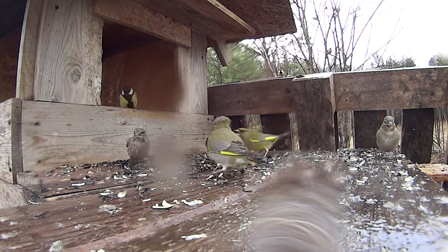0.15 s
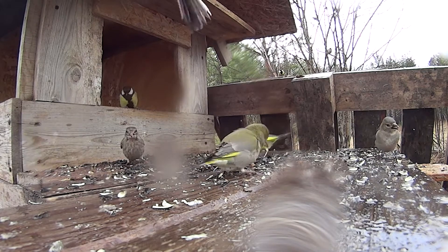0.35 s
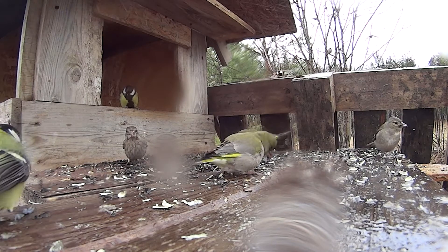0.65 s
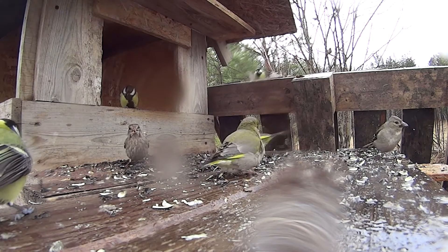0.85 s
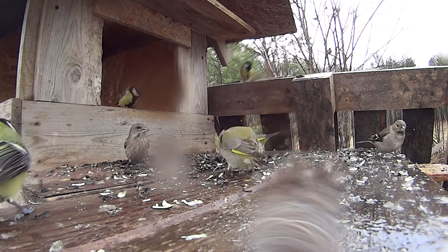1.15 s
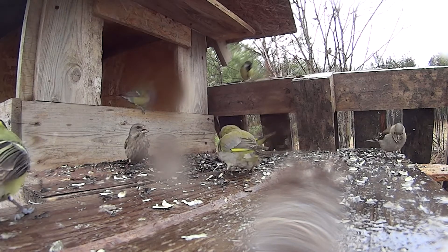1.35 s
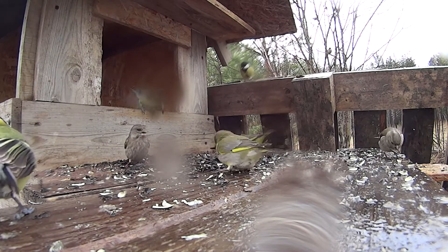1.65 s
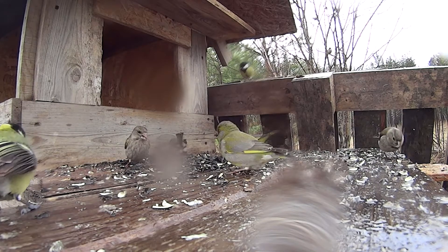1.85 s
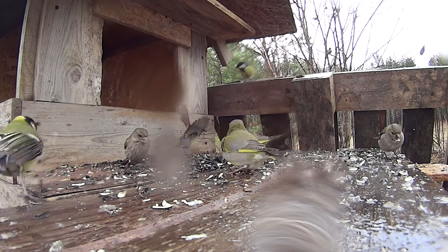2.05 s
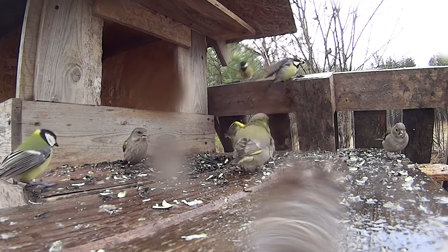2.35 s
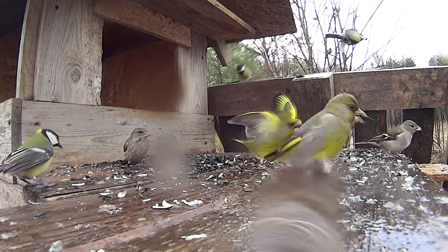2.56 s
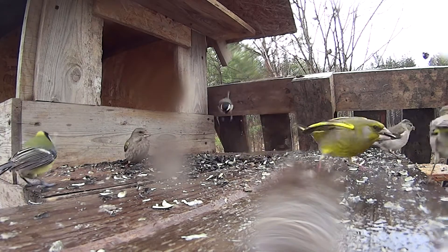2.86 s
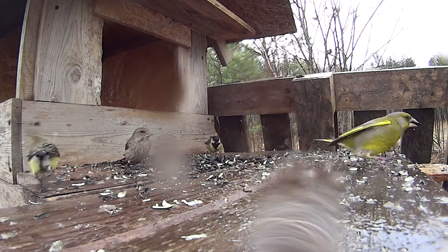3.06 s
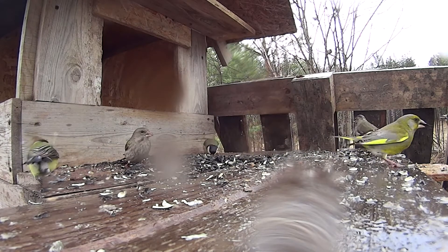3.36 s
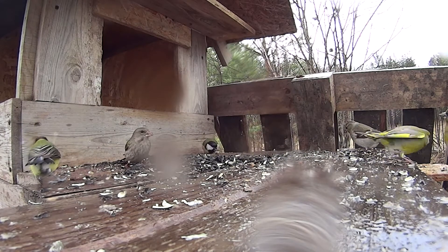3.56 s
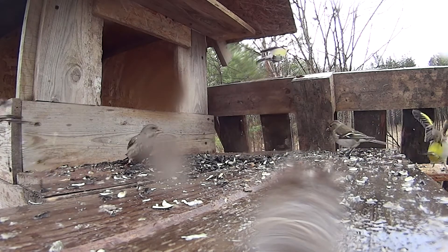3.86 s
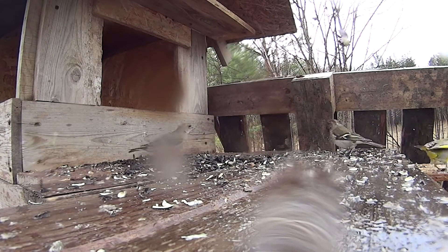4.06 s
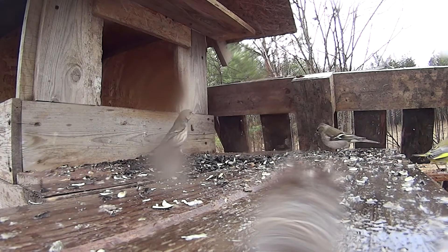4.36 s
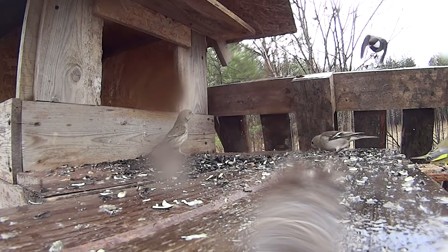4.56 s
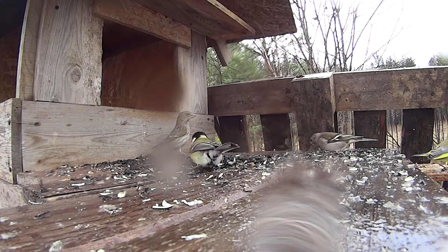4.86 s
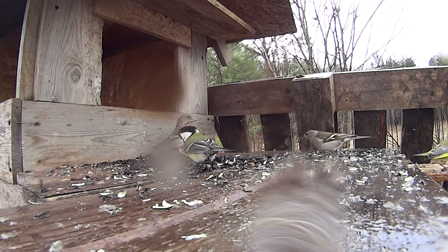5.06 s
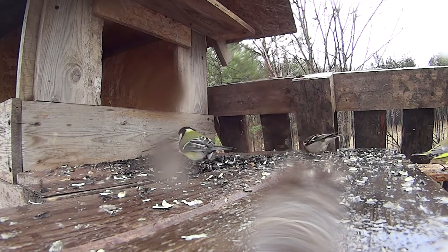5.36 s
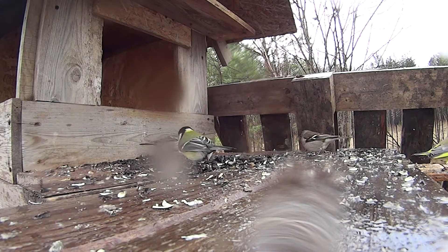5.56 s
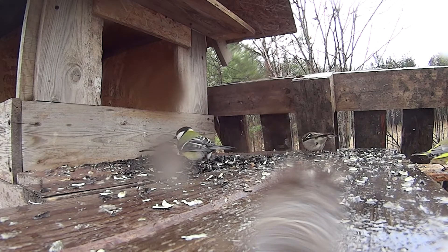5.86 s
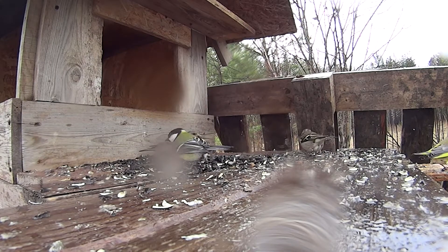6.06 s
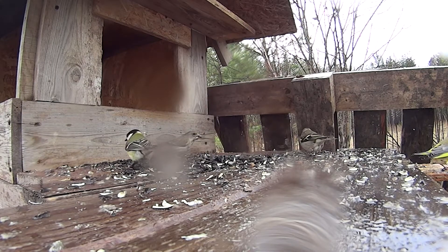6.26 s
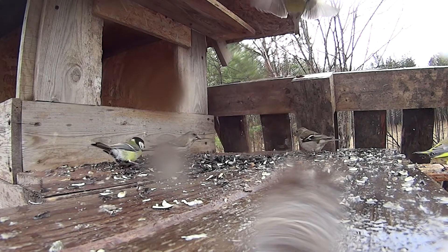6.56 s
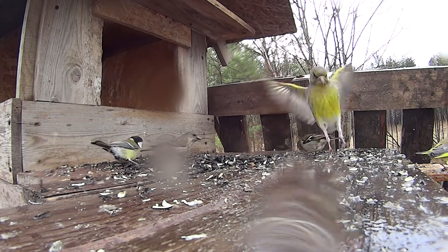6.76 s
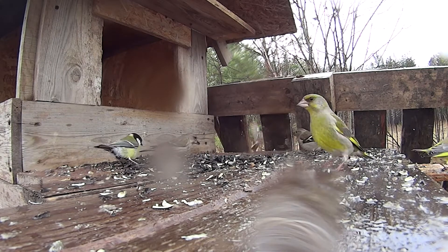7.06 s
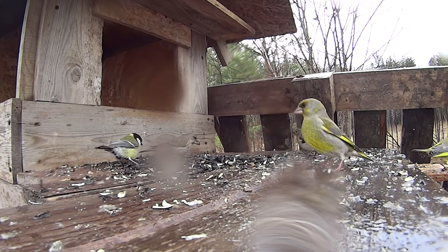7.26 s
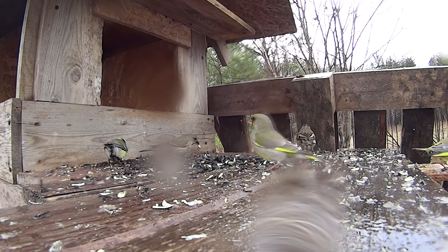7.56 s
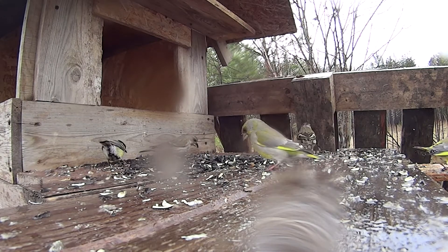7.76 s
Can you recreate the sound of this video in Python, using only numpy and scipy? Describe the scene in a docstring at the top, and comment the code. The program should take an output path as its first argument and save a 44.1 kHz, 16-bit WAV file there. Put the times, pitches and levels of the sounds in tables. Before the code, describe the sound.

Wing whirrs, brittle seed snaps and a clattering burst of beak and claw knocks on boards, with high chirps and tit song in quiet open air.

```python
"""A whirr of wings over a hush of open air, with husks cracking and a tit singing from the start.
Small birds feed on a wooden table, heard from the boards: beaks and claws ring its tuned modes,
husks snap as short bursts of noise, and wings make throbbing noise or single puffs of air.
The tit's two loud notes end in a faint tinkle; other birds chip and whistle, all as gliding sine tones.
Soft feet thud, claws scuffle and loose husks tick, and short echoes follow table and singers."""
import sys
import numpy as np
from scipy import signal
from scipy.fft import rfft, irfft, next_fast_len
from scipy.io import wavfile

SR = 44100
rng = np.random.default_rng(int(sys.argv[2]) if len(sys.argv) > 2 else 0)


def digitize_waveform(pressure):
    """Quantize a signal to 16-bit integers and store it at the path in sys.argv[1].

    Rows of a 2-D input are taken as channels; values are limited to [-1, 1].
    """
    field = np.atleast_2d(pressure).T
    bounded = np.clip(field, -1, 1)
    quanta = np.round(bounded * 32767).astype(np.int16)
    wavfile.write(sys.argv[1], SR, quanta)


N = 349272   # length in samples
TIME = np.arange(N) / SR
BLOW = TIME[:SR // 6]   # time within one blow, s
CUTOFF_HZ = 11100   # top of the whole sound

# All table levels are starting points; the functions add their own trims.
# colour of the open air: f/Hz, level/dB
AIR_COLOUR = [(200, -14), (300, -2.5), (400, -9.5), (800, -3.5), (1530, -5), (1900, -9.5), (4000, -14),
              (4950, -11), (5700, -16), (11000, -19)]
# colour of the low whirr of wings: f/Hz, level/dB
RUMBLE_COLOUR = [(20, -8.5), (40, -0.5), (150, -2), (200, 4.5), (255, -4.5), (320, -17), (800, -32)]
# colour of the swish of feathers: f/Hz, level/dB
SWISH_COLOUR = [(350, -0.5), (1400, 4.5), (2200, -3.5), (3500, -1.5), (5000, -2), (11000, -1.5)]
# colour of the loose husks: f/Hz, level/dB
HUSK_COLOUR = [(1500, -17), (3000, 5.5), (5000, 11), (11000, -9)]
# how alike left and right are: f/Hz, likeness (0-1)
LEFT_RIGHT_LIKENESS = [(60, 1), (250, 0.97), (700, 0.1), (2300, 0.52), (10000, 0.79)]
# how far left runs ahead of right: f/Hz, phase/rad
LEFT_LEAD = [(250, 0.19), (1500, 1.34), (3500, 0.78)]
# birds flying in or off: t/s, full-strength length/s, low rumble level/dB, feather swish level/dB
WING_FLIGHTS = [(-0.05, 0.25, -47, -57.5), (2.194, 0.075, -50.5, -61), (2.784, 0.26, -51, -67),
                (3.97, 0.34, -47.5, -60.5), (6.465, 0.23, -52.5, -61.5), (7.303, 0.71, -55, -78)]
# sweeps through the loose husks: t/s, full-strength length/s, level/dB
HUSK_SWEEPS = [(.02, 0.024, -46.5), (4.037, 0.01, -53), (4.091, 0.023, -45.5), (4.37, 0.021, -53)]
# seed husks cracking: t/s, peak level/dB
HUSK_CRACKS = [(0.0325, -22.5), (0.051, -27), (0.1247, -32.5), (0.142, -32), (1.847, -36.5),
               (2.0052, -30.5), (2.077, -38), (2.3737, -33), (2.6855, -31.5), (2.781, -33.5), (2.795, -34),
               (2.824, -35), (3.398, -31), (3.419, -24.5), (3.9295, -28), (3.9355, -26.5), (3.944, -23.5),
               (4.136, -35), (4.178, -43), (4.2498, -33), (4.301, -30), (4.53, -29.5), (4.642, -38),
               (4.8506, -21.5), (4.861, -21.5), (4.9723, -25), (5.666, -33.5), (6.157, -36), (6.231, -37),
               (6.2538, -16), (6.47, -28.5), (6.738, -34), (6.819, -36), (6.9001, -27.5), (7.676, -33.5),
               (7.6932, -16.5)]
# one phrase of the tit's song: t/s into the phrase, note shape, level/dB
TIT_PHRASE = [(0, "low", -48), (.166, "high", -49.3), (.338, "tinkle", -61)]
# bouts of the tit's song: start t/s, end t/s, time from phrase to phrase/s
SONG_BOUTS = [(-1.148, 1.78, .398), (6.247, 7.92, .393)]
# calls of the other birds: t/s, note shape, level/dB
OTHER_CALLS = [(0.124, "chip", -47.5), (0.217, "chip", -46), (0.525, "thin", -51), (0.748, "peep", -51),
               (1.12, "rise", -50), (1.148, "thin", -45), (1.212, "buzz", -50), (1.24, "chirp", -50),
               (1.245, "burr", -57), (1.252, "rise", -51), (1.27, "rasp", -52.5), (1.304, "burr", -53.5),
               (1.395, "peep", -48), (2.445, "chip", -49), (3.07, "slur", -58), (3.32, "slur", -65),
               (3.525, "buzz", -56), (3.64, "burr", -54.5), (4.998, "buzz", -54), (5.009, "rise", -45),
               (5.014, "chirp", -62), (5.05, "rasp", -61), (5.149, "rise", -49), (5.172, "peep", -55),
               (5.607, "query", -55), (6.594, "chip", -53.5), (6.668, "chip", -53), (6.77, "chip", -52.5),
               (6.97, "buzz", -57), (6.99, "chirp", -59), (7.025, "tick", -54), (7.043, "tick", -50),
               (7.062, "burr", -58), (7.065, "rasp", -58)]
# path of each kind of bird note, by name: t/s into the note, f/Hz, level/dB
NOTE_SHAPES = { "low": [(0, 3450, -3), (.05, 3920, -5), (.08, 3960, -11.5), (.16, 3960, -19.5)],
               "high": [(0, 5050, -1), (.014, 4780, 2), (.033, 4790, -4), (.043, 4750, -16),
               (.054, 4580, 2), (.086, 4480, 3)], "tinkle": [(0, 6840, -4), (.026, 6810, -6),
               (.032, 6000, -3), (.055, 5990, 3)], "thin": [(0, 7700, -12), (.11, 7300, -15)],
               "slur": [(0, 4570, 0), (.075, 4280, -11)], "peep": [(0, 3850, -2), (.055, 3936, -12.5)],
               "rasp": [(0, 3746, -0.5), (.06, 3975, -6)], "chip": [(0, 4060, -8), (.012, 3485, -0.5),
               (.028, 2900, -4.5)], "rise": [(0, 4360, 2), (.009, 5820, -7), (.019, 6450, -1.5),
               (.031, 9200, -14)], "query": [(0, 2690, 2.5), (.028, 4270, 0)], "buzz": [(0, 5390, -6.5),
               (.037, 4990, -0.5)], "chirp": [(0, 4330, 3), (.033, 4920, 2.5)], "tick": [(0, 4360, -1),
               (.011, 3460, -1)], "burr": [(0, 3457, -5.5), (.022, 3220, 4)]}
# how rough the rougher notes are, by name: hoarseness (0-1)
NOTE_HOARSENESS = {"chirp": .45, "buzz": 0.44, "burr": 0.4, "rasp": .5, "rise": 0.25, "chip": 0.16, "query":
                   .15}
# beak and claw on wood: t/s, peak level/dB, hollow body level/dB, f/Hz that rings most
WOOD_KNOCKS = [(.321, -41, -50, 1320), (0.5186, -36, -43, 1360), (0.9366, -32.5, -54, 1268),
               (1.1582, -23.5, -47.5, 3210), (1.3368, -32, -53, 1734), (2.3324, -28.5, -39.5, 3230),
               (2.5475, -27.5, -41, 3250), (2.5503, -15.5, -46.5, 1850), (2.5699, -32, -40, 3190),
               (2.588, -25.5, -35.5, 2980), (2.6718, -33.5, -42, 3660), (2.7282, -30, -40, 1440),
               (2.7345, -26, -40, 1460), (2.7791, -27, -39, 2900), (2.783, -24.5, -45, 3840),
               (2.7944, -22.5, -37, 2700), (2.824, -30, -41, 3100), (2.831, -34, -33, 3150),
               (2.8734, -25, -40, 1700), (2.8877, -36, -52, 3700), (2.914, -43, -69, 3140),
               (2.9791, -32, -37, 3370), (2.9879, -28, -45, 2220), (3.0107, -22, -37, 2870),
               (3.0158, -34, -44, 2800), (3.1121, -32, -37.5, 2030), (3.1449, -24.5, -40.5, 3130),
               (3.3014, -38.5, -48, 2450), (3.4447, -22, -46.5, 2220), (3.5215, -26, -43, 2120),
               (3.5394, -32.5, -42, 2290), (3.594, -30, -50, 2640), (3.74, -36, -44.5, 1130),
               (4.1951, -44, -41.5, 2340), (4.2715, -34, -44, 1220), (6.8196, -28.5, -42.5, 1460),
               (6.827, -26.5, -41.5, 1340), (7.035, -26.5, -38, 2790), (7.0809, -33, -38, 3620)]
# ringing modes of the table: f/Hz, level/dB, time to die away by 60 dB/s
BOARD_MODES = [(199.5, -15, 0.12), (254, 5, 0.11), (430, -0.5, 0.053), (522, -1.5, 0.056),
               (798, -0.5, 0.061), (970, -2, 0.016), (1337, -1.5, 0.028), (1701, -8, 0.052),
               (2270, 2.5, 0.02), (2685, -0.5, 0.014), (3212, 4.5, 0.0099), (3830, -2, 0.011)]
# wing strokes right at the microphone: t/s, level/dB, f/Hz of the puff
WING_PUFFS = [(0.538, -23.5, 104), (0.617, -27, 155), (0.65, -27, 89), (0.665, -19, 78.5),
              (0.671, -19, 172.7), (4.339, -29.5, 77)]
# feet landing softly: t/s, level/dB
SOFT_HOPS = [(0.903, -34), (1.37, -36.5), (1.464, -36.5), (2.553, -34.5), (2.989, -38), (3.062, -35.5),
             (3.403, -34.5), (3.882, -34), (3.992, -40.5), (4.2, -37), (4.953, -39), (6.818, -33),
             (7.037, -32)]
# claws and wing tips dragging on the wood: t/s, full-strength length/s, level/dB
WOOD_SCUFFLES = [(2.7, .04, -52), (2.773, .06, -50.5), (2.875, .05, -47.5), (2.98, .035, -53),
                 (3.784, .02, -50), (6.46, .1, -57.5)]

LEAD_IN_S = 0.0037   # lead-in before the peak of each blow


def from_db(db):
    """Turns decibels into a plain gain."""
    return 10 ** (np.asarray(db) / 20)


def rms_one(x):
    """Scales a sound to an average strength (rms) of 1."""
    return x / np.sqrt(np.mean(x ** 2) + 1e-20)


def at_hz(points, hz):
    """Reads a table on a log-frequency axis."""
    f, value = np.transpose(points)
    return np.interp(np.log(hz + 1e-3), np.log(f), value)


def add(out, s, sound):
    """Mixes a sound in at time s."""
    i = max(0, round(s * SR))
    out[:, i:i + sound.shape[-1]] += sound[..., :N - i]


def band(x, low_hz, high_hz, order=2):
    """Keeps the part of a sound between two frequencies."""
    limits = [low_hz, min(high_hz, SR * 4 / 9)]
    return signal.sosfilt(signal.butter(order, limits, "band", fs=SR, output="sos"), x)


def drift(rate_hz, size=N):
    """Smooth random wandering with spread 1, from noise smoothed twice."""
    warm_up = SR // 2   # let the smoothing settle first
    r = np.exp(-2 * np.pi * rate_hz / SR)
    wander = signal.lfilter([1], [1, -2 * r, r * r], rng.standard_normal(size + warm_up))
    return rms_one(wander[warm_up:])[:size]


def random_ticks(per_s, spread_db):
    """Single samples at random moments, of uneven strength."""
    strength = from_db(spread_db * np.minimum(rng.exponential(1, N), 3))
    return (rng.random(N) < per_s / SR) * strength


def pair(mid, side, hz):
    """Makes left and right from a shared part and an opposed part, as alike as the table says."""
    alike = np.clip(at_hz(LEFT_RIGHT_LIKENESS, hz), 0, .995)
    opposed = side * np.array([[1], [-1]])
    return np.sqrt((1 + alike) / 2) * mid + np.sqrt((1 - alike) / 2) * opposed


def noise(colour):
    """Stereo noise of a given colour, rms 1."""
    size = next_fast_len(N)
    hz = np.arange(size // 2 + 1) * SR / size
    top_cut = 1 / (1 + (hz / (1.5 * colour[-1][0])) ** 4)   # fades out above the table's last point
    mid, side = rfft(rng.standard_normal((2, size)))
    spectrum = pair(mid, side, hz) * from_db(at_hz(colour, hz)) * top_cut
    return rms_one(irfft(spectrum, size)[:, :N])


def swell(s, length, rise_s, fade_s):
    """Gain that rises until time s, holds, then fades."""
    rise, fade = (TIME - s) / rise_s, (s + length - TIME) / fade_s
    return np.exp(np.clip(np.minimum(rise, fade), -30, 0))


def contact(decay_s, grit, rise_s=0.00017):
    """A short soft rise, one sharp peak, then a dying train of rough grains."""
    since_peak = BLOW - LEAD_IN_S
    envelope = np.exp(-np.maximum(since_peak / decay_s, -since_peak / rise_s)) + 1e-9
    force = grit * rng.standard_normal(len(BLOW)) ** 3 * envelope   # cubing makes a few grains stand out
    force[int(LEAD_IN_S * SR)] += 1
    return force


def ring(force, hz, t60):
    """One ringing mode driven by a force, scaled to height 1."""
    r, w = from_db(-60 / (t60 * SR)), 2 * np.pi * hz / SR
    y = signal.lfilter([1, 0, -1], [1, -2 * r * np.cos(w), r * r], force)
    return y / np.abs(y).max()


def spread(mode, hz):
    """Sends a ringing board to left and right a little out of step, one way or the other."""
    quarter_cycle = int(SR / hz) // 4
    late = np.pad(mode, (quarter_cycle, 0))[:len(mode)]
    return pair(mode, late * rng.choice([-1, 1]), hz)


def snap(low_hz, high_hz, decay_s, grit):
    """A brittle stereo click in one band, height 1."""
    mid, side = band(np.array([contact(decay_s, grit), contact(decay_s, grit)]), low_hz, high_hz)
    y = pair(mid, np.roll(side, rng.integers(3, 12)), high_hz)
    return y / np.abs(y).max()


def open_air(level_db=-57):
    """The steady hush of open air, as coloured noise."""
    return from_db(level_db) * noise(AIR_COLOUR)


def wings(rumble_db=2, swish_db=4, beat_hz=19, beat_db=2.5, flutter_db=4, grain_db=4.0):
    """Each flight swells and fades; wingbeats throb in a low whirr and in the grainy swish of feathers."""
    approach_s, rumble_fade_s, swish_fade_s = 0.095, 0.7, 0.25
    low, high = from_db(-54), from_db(-68)   # calm level between flights, before the trims
    for s, length, rumble, swish in WING_FLIGHTS:
        low = np.hypot(low, from_db(rumble) * swell(s, length, approach_s, rumble_fade_s))
        high = np.hypot(high, from_db(swish) * swell(s, length, approach_s, swish_fade_s))
    uneven_hz = beat_hz * (1 + 0.196 * drift(3.09))
    beat = np.sin(2 * np.pi * np.cumsum(uneven_hz) / SR)
    high = high * from_db(swish_db + beat_db * beat + flutter_db * drift(19.0) + grain_db * drift(540))
    low = low * from_db(rumble_db + 1.1 * beat)
    return high * noise(SWISH_COLOUR) + low * noise(RUMBLE_COLOUR)


def litter(per_s=22, level_db=-58, spread_db=3.0, decay_s=0.0038):
    """Loose husks tick faintly at random moments, each a dying burst of noise."""
    decay = np.exp(-1 / (decay_s * SR))
    envelope = signal.lfilter([1], [1, -decay], random_ticks(per_s, spread_db))
    return from_db(level_db) * envelope * noise(HUSK_COLOUR)


def brushes(rise_s=0.011, fade_s=0.0061, grain_db=4, low_hz=5800):
    """Wing tips and feet sweep through the loose husks in short gritty strokes of high noise."""
    effort = sum(from_db(db) * swell(s, length, rise_s, fade_s) for s, length, db in HUSK_SWEEPS)
    hiss = rms_one(band(noise(SWISH_COLOUR), low_hz, CUTOFF_HZ))
    return effort * from_db(grain_db * drift(530)) * hiss


def husks(bright_db=1, lag_s=0.00058, lower_db=-27, lower_follows=0.42):
    """A husk splits with one snap and a few milliseconds of splintering."""
    out = np.zeros((2, N))
    for s, peak in HUSK_CRACKS:
        start = s + lag_s - LEAD_IN_S
        add(out, start, from_db(peak + bright_db) * snap(4870, 11400, decay_s=0.0024, grit=0.19))
        # the lower treble grows less than the bright snap does
        lower = from_db(lower_db + lower_follows * peak)
        add(out, start, lower * snap(2620, 6000, decay_s=0.0054, grit=0.34))
    return out


def echoes(x, t60, wet_db):
    """Many weak reflections, thinning away, made from a dying burst of noise."""
    t = TIME[:SR * 2 // 3]
    envelope = from_db(-60 * t / t60) * (1 - np.exp(-t / 0.002))
    tail = pair(*rng.standard_normal((2, len(t))), 2600) * envelope
    tail /= np.sqrt(np.sum(tail ** 2) / 2)
    return from_db(wet_db) * signal.fftconvolve(x, tail, axes=1)[:, :N]


def tit_song(opening_db=-12.5, warm_up_s=1.1):
    """Repeats the phrase evenly through each bout, which opens softly: rows (t/s, shape, level/dB)."""
    notes = []
    for start, end, period in SONG_BOUTS:
        for phrase_s in np.arange(start, end, period):
            for offset, shape, db in TIT_PHRASE:
                s = phrase_s + offset
                if 0 <= s < end:
                    softness = max(0, 1 - (s - start) / warm_up_s)
                    notes.append((s, shape, db + opening_db * softness))
    return notes


def birds(notes, level_db=1, pitch_scatter=0.0054, trill_hz=290, trill_depth=0.11, hoarse_depth=0.079,
          waver_db=2.5, buzz_db=7, second_ratio=.76, second_share=0.73):
    """Each note is a gliding whistle; hoarseness adds a fast trill and the syrinx's lower second voice."""
    out = np.zeros((2, N))
    for s, shape, level in notes:
        hoarse = NOTE_HOARSENESS.get(shape, .035)   # clear notes are still slightly rough
        when, hz, db = np.transpose(NOTE_SHAPES[shape])
        t = TIME[:int(when[-1] * SR)]
        size = len(t)
        glide = np.interp(t, when, hz) * (1 + pitch_scatter * rng.normal())
        envelope = from_db(level + level_db + np.interp(t, when, db)) * signal.windows.tukey(size, .15)
        uneven_hz = trill_hz * (1 + 0.25 * drift(71, size))
        trill = np.sin(2 * np.pi * np.cumsum(uneven_hz) / SR)
        voices = (glide, 1), (second_ratio * glide, second_share * hoarse)
        for pitch, share in voices:
            pitch = pitch * (1 + hoarse * (trill_depth * trill + hoarse_depth * drift(500, size)))
            flicker_db = waver_db * drift(120, size) + buzz_db * hoarse * (trill + 1.0)
            gain = share * envelope * from_db(flicker_db)
            add(out, s, gain * np.sin(2 * np.pi * np.cumsum(pitch) / SR))
    return out


def knocks(peak_db=-11.0, body_db=1.0, favour_db=11, favour_octaves=0.22, scatter_db=1.0, detune=0.047,
           lag_s=0.0003, slow_s=.004, top_hz=4500, tick_db=-20):
    """Each blow rings every mode of the table; where it falls decides which ones ring most."""
    wood, ticks = np.zeros((2, N)), np.zeros((2, N))
    lowest_hz, highest_hz = BOARD_MODES[0][0], BOARD_MODES[-1][0]
    for s, peak, body, pitch in WOOD_KNOCKS:
        start = s + lag_s - LEAD_IN_S
        force = contact(decay_s=0.0011, grit=0.025, rise_s=0.00097)
        balance = [(250, body - 4), (450, body + body_db), (1700, peak + peak_db)]
        for hz, db, t60 in BOARD_MODES:
            level = at_hz(balance, hz) + db + scatter_db * rng.normal()
            level += favour_db * np.exp(-(np.log2(hz / pitch) / favour_octaves) ** 2)
            mode = ring(force, hz * (1 + detune * rng.normal()), t60) * rng.choice([-1, 1])
            # low bending waves travel slowest
            travel = slow_s * (np.sqrt(lowest_hz / hz) - np.sqrt(lowest_hz / highest_hz))
            add(wood, start + travel, from_db(level) * spread(mode, hz))
        add(ticks, start, from_db(peak + tick_db) * snap(3400, 7900, decay_s=0.0078, grit=0.21))
    return band(wood, 53, top_hz, order=3) + ticks


def puffs(width_cycles=0.4):
    """A close wing stroke pushes and pulls the air once."""
    out = np.zeros((2, N))
    middle = BLOW.mean()
    for s, db, hz in WING_PUFFS:
        cycles = (BLOW - middle) * hz
        bell = np.exp(-(cycles / width_cycles) ** 2 / 2)
        add(out, s - middle, -from_db(db) * np.cos(2 * np.pi * cycles) * bell)
    return out


def hops(soft_hz=300, lag_s=0.00059):
    """Soft feet press the wood too slowly to ring much beyond its lowest modes."""
    out = np.zeros((2, N))
    force = BLOW ** 2 * np.exp(-2 * np.pi * soft_hz * BLOW)
    for s, peak in SOFT_HOPS:
        for hz, db, t60 in BOARD_MODES:
            softening = np.hypot(1, (hz / soft_hz) ** 4)
            mode = ring(force, hz * (1 + 0.079 * rng.normal()), t60) / softening
            add(out, s + lag_s, from_db(peak + db) * spread(mode, hz))
    return out


def scuffle(per_s=320, spread_db=3.0, lows_db=10, top_hz=4300, rise_s=0.013, fade_s=0.035):
    """Dense uneven slips of claw and feather keep the boards ringing."""
    effort = sum(from_db(db) * swell(s, length, rise_s, fade_s) for s, length, db in WOOD_SCUFFLES)
    slips = random_ticks(per_s, spread_db)
    out = 0
    for hz, mode_db, t60 in BOARD_MODES[2:]:   # without the two lowest modes
        force = slips * rng.standard_normal(N) + 1e-18   # never quite zero
        mode = rms_one(ring(force, hz, t60))
        level = mode_db + at_hz([(500, lows_db), (900, 0)], hz)
        out = out + from_db(level) * spread(mode, hz)
    return effort * rms_one(band(out, 620, top_hz))


def scene(echo_s=0.1, echo_db=-16, trees_top_hz=5200):
    """The table close by, the singers among the trees, a steady hush of open air."""
    table = knocks() + husks()
    song, calls = birds(tit_song()), birds(OTHER_CALLS)
    near = table + echoes(table, t60=0.071, wet_db=-15.5)
    near += wings() + litter() + brushes() + puffs() + hops() + scuffle()
    far = song + calls + echoes(song, t60=0.25, wet_db=-1.5) + echoes(calls, t60=0.24, wet_db=-11.5)
    # the trees scatter the calls back, duller
    far += band(echoes(calls, t60=0.34, wet_db=-7.5), 2700, trees_top_hz)
    add(far, echo_s, from_db(echo_db) * song)   # one distinct echo from the edge of the wood
    return (near + far + open_air()) * from_db([[-.4], [.4]])   # right slightly louder


def record(dry):
    """The left side runs slightly ahead of the right; the top is cut steeply."""
    size = next_fast_len(N + SR // 4)
    lead = at_hz(LEFT_LEAD, np.arange(size // 2 + 1) * SR / size)
    turn = np.exp(.5j * lead * np.array([[1], [-1]]))   # half the lead forward on the left, half back on the right
    sides = irfft(rfft(dry, size) * turn, size)[:, :N]
    return signal.sosfilt(signal.ellip(12, .2, 70, CUTOFF_HZ, fs=SR, output="sos"), sides)


dry = scene()
out = record(dry)
digitize_waveform(out)
```